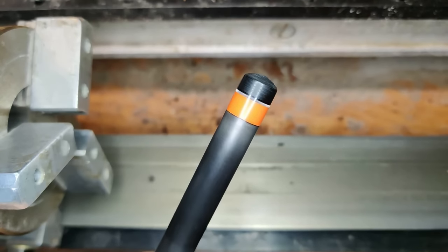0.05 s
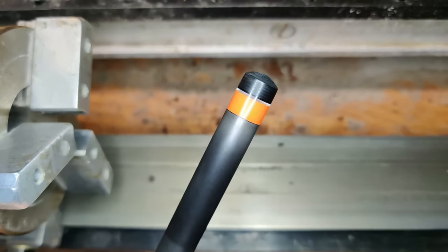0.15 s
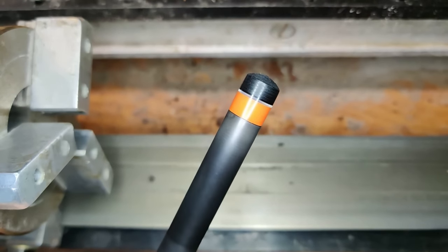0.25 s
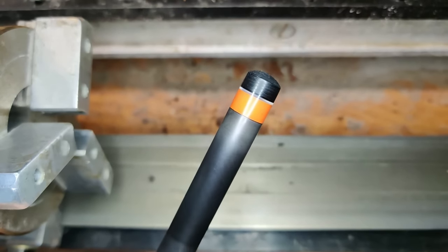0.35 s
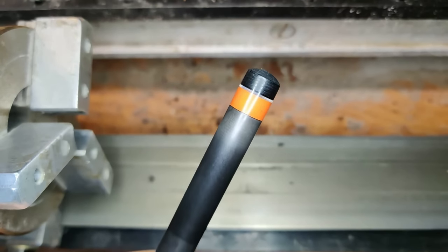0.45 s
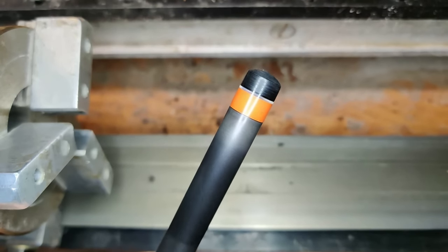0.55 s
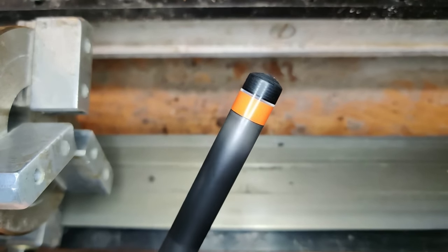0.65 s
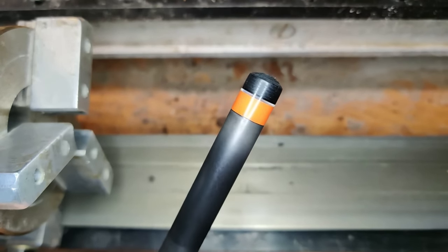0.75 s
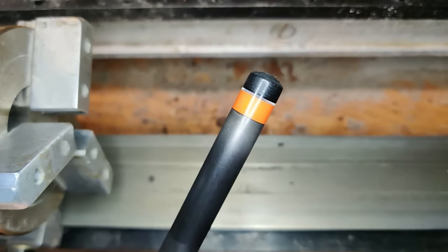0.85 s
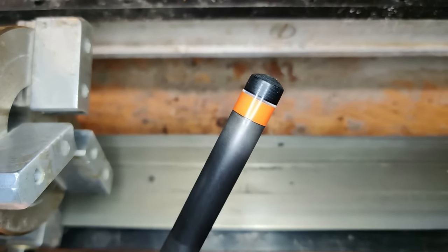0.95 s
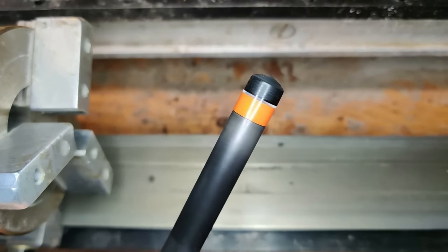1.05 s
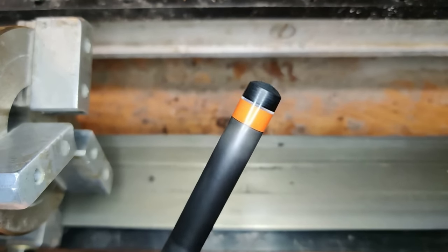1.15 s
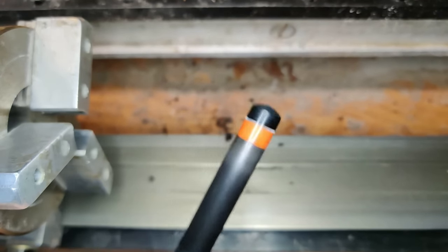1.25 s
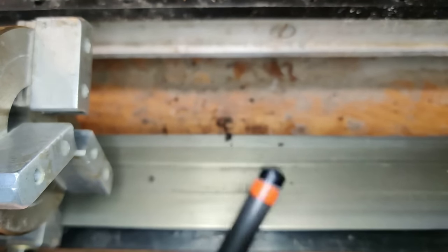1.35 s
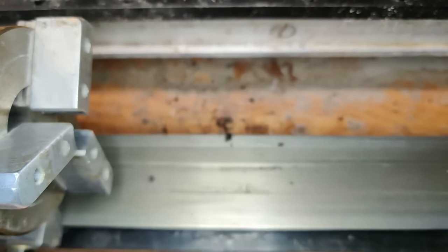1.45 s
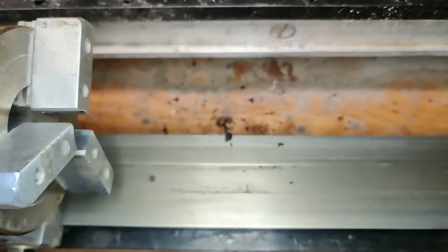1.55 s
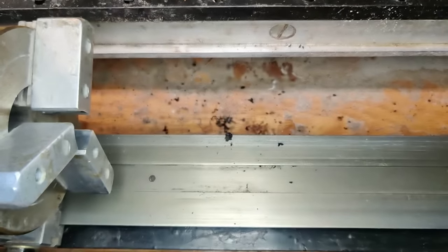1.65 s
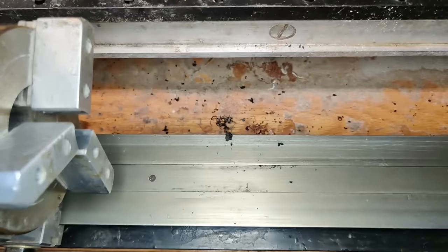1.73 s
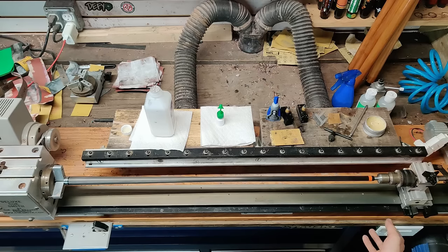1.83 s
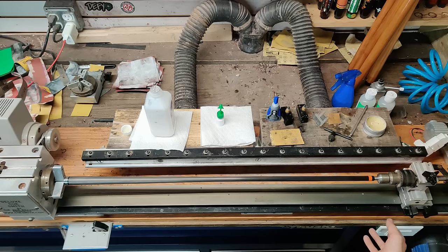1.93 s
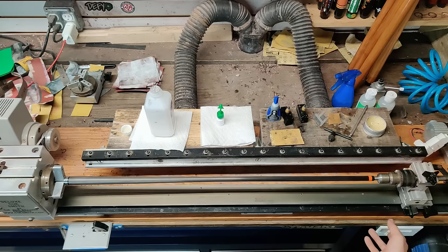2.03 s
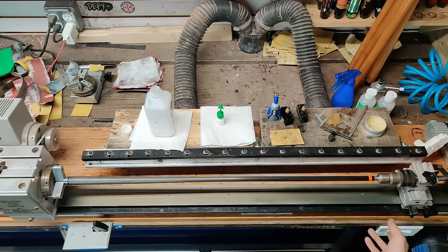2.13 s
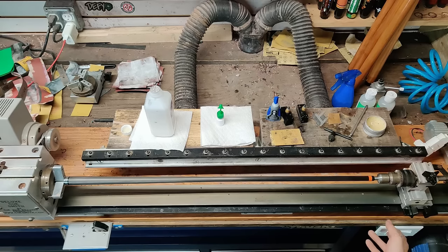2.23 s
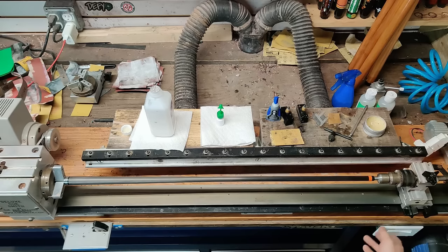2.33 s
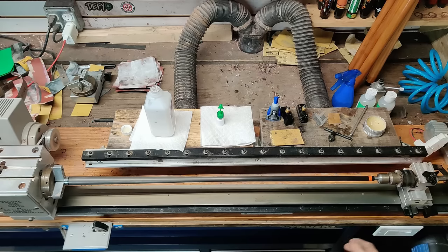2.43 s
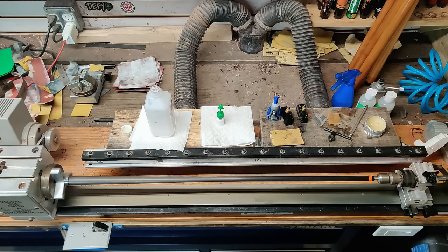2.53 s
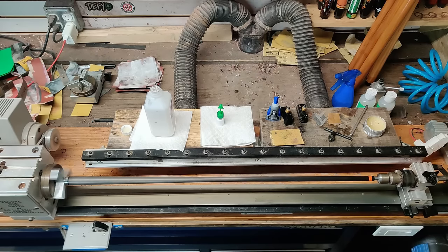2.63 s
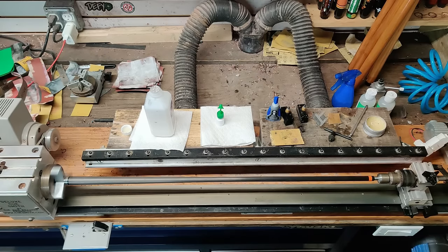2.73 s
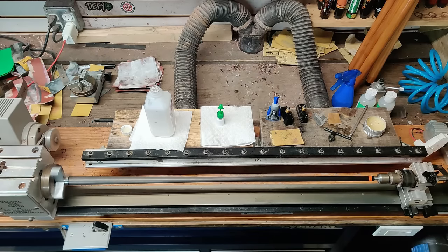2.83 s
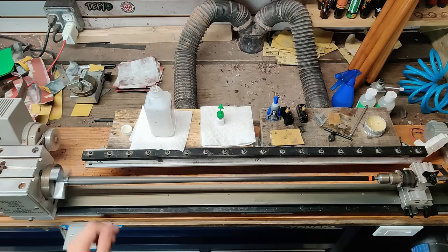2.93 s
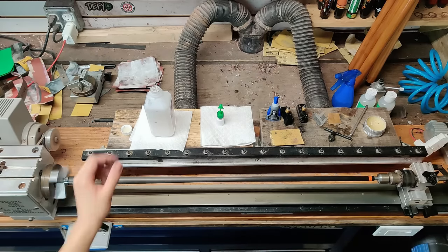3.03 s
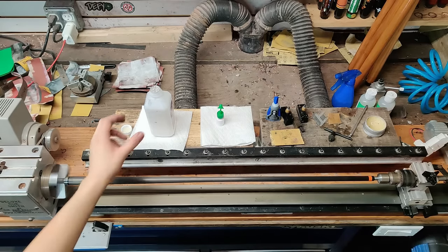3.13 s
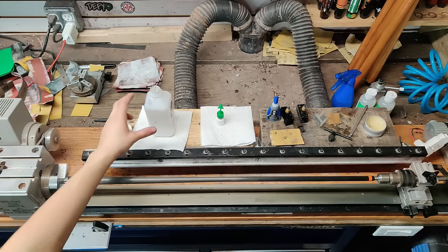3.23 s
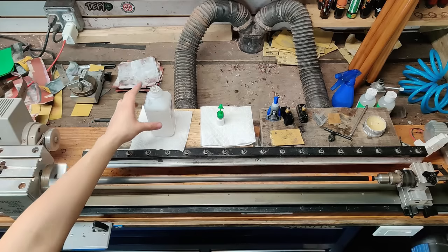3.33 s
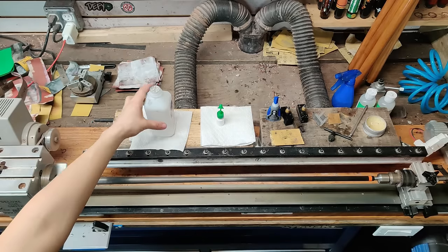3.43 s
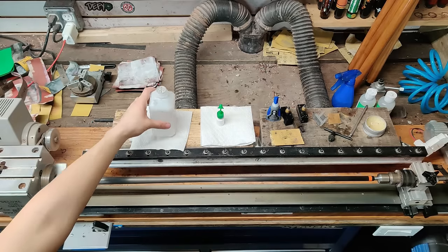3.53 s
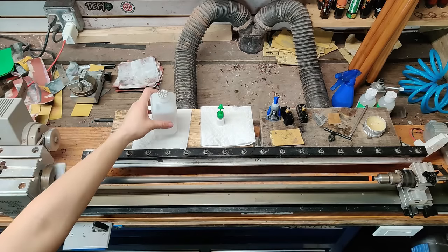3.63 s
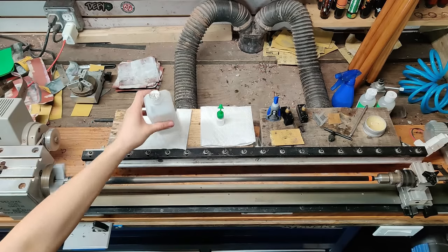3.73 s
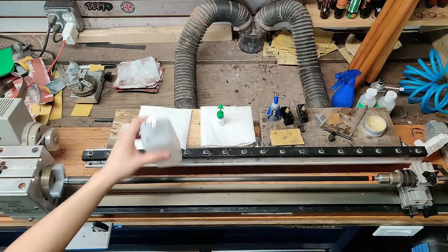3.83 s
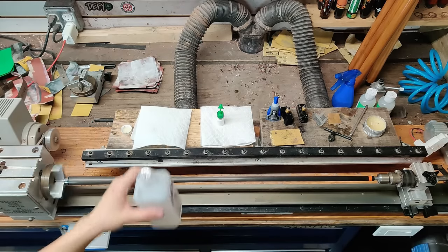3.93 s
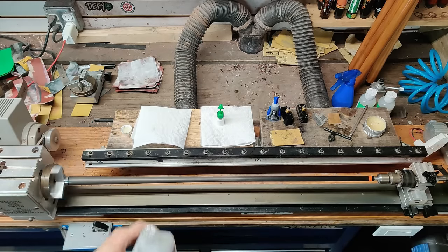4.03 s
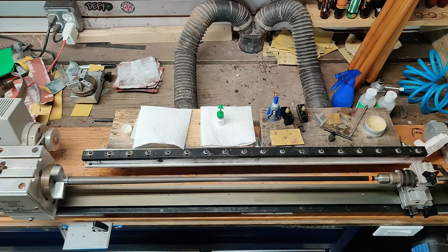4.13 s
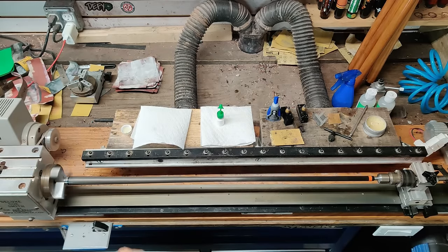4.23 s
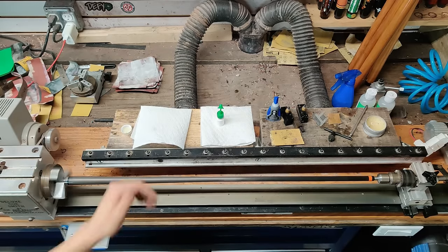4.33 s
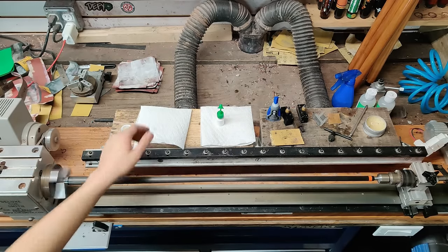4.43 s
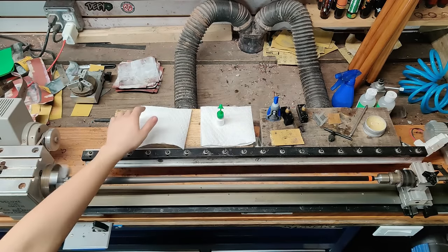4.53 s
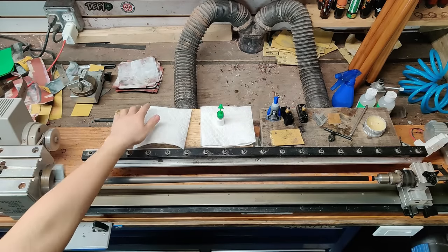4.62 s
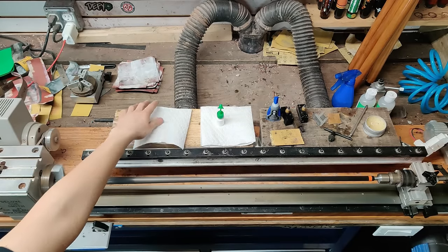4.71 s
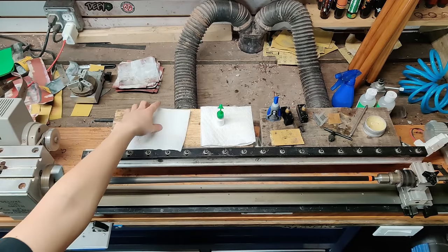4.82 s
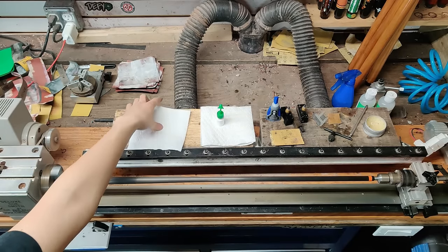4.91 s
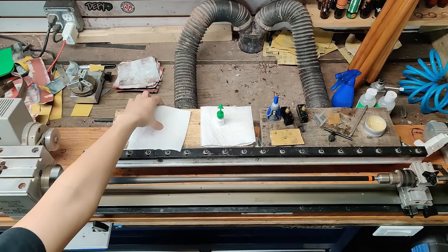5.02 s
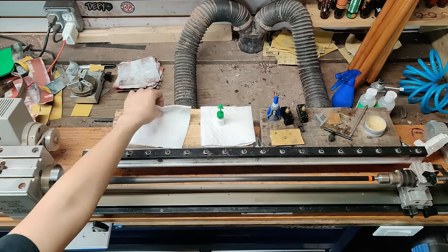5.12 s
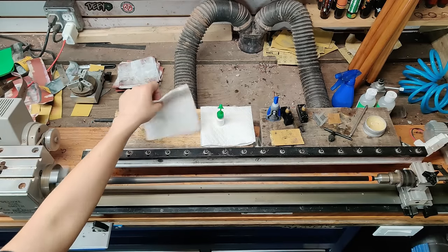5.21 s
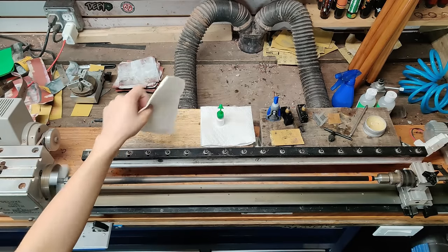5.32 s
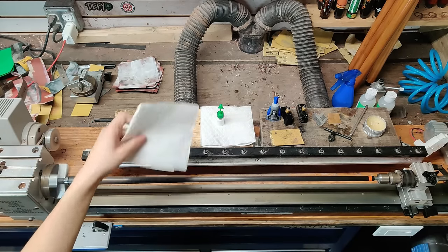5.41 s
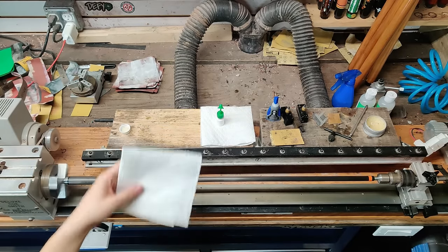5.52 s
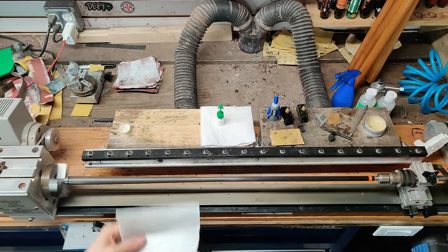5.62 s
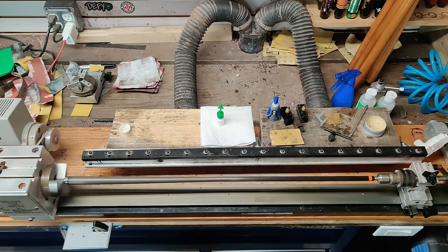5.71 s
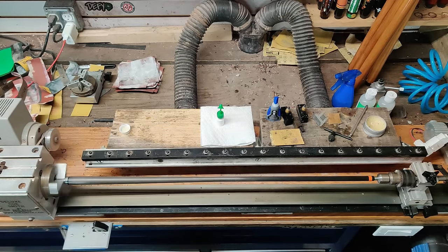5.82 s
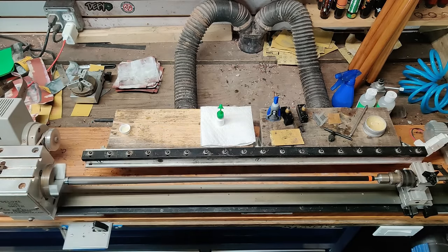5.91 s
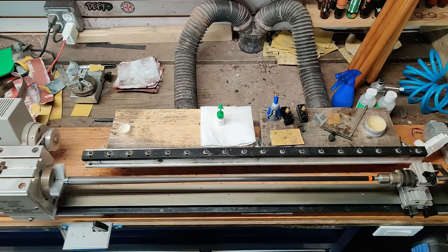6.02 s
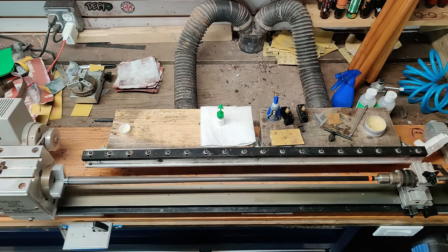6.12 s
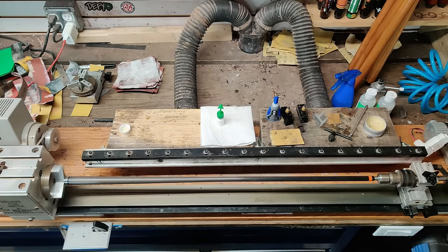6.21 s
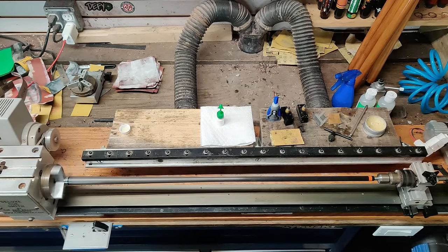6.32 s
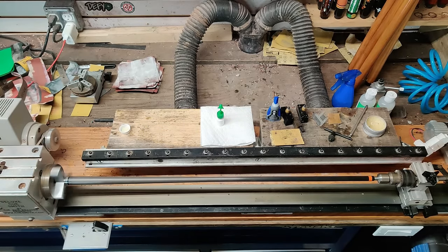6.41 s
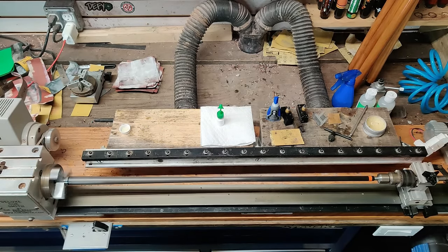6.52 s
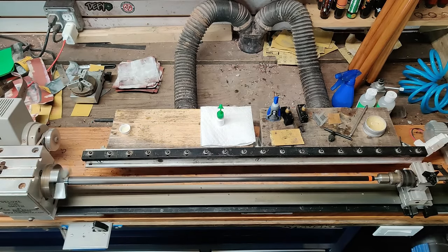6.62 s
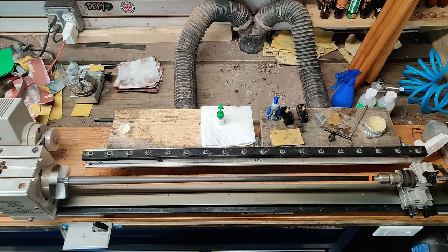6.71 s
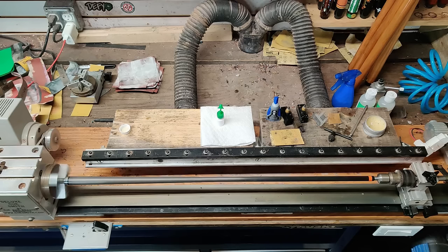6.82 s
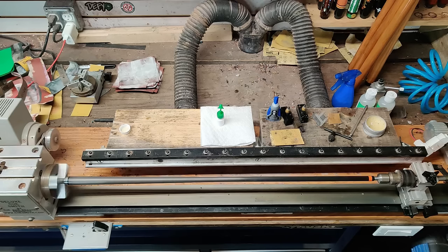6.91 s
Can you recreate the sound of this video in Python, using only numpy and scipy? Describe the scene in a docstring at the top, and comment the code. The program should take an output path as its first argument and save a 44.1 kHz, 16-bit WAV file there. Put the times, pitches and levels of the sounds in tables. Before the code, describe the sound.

Fingers rub faintly on a shaft, then two switches click and a small lathe starts, running with a throbbing whine and high hiss.

```python
"""Fingers rub faintly along the shaft of a small lathe, close to the microphones; a sleeve rustles and
fingertips bump the right port. Then, from further back in the workshop, two switches click and the motor
runs up, whining on its armature slots while brushes and bearings hiss. Both throb once for each turn of
the spindle. A bottle slides briefly on the bench. The two microphone ports colour the sound differently."""
import sys
import numpy as np
from scipy import signal
from scipy.fft import rfft, irfft
from scipy.io import wavfile

SR = 44100
rng = np.random.default_rng(int(sys.argv[2]) if len(sys.argv) > 2 else 0)


def master_out(mix):
    """Clip the mix to full scale and print it as 16-bit PCM to the path in sys.argv[1]."""
    frames = np.transpose(np.atleast_2d(mix))
    ceiling = np.clip(frames, -1, 1)
    pcm = np.round(ceiling * 32767).astype(np.int16)
    wavfile.write(sys.argv[1], SR, pcm)


N = 306936
TIME = np.arange(N) / SR
BINS = np.arange(N // 2 + 1) * SR / N + 1e-3   # Hz, kept above zero

STEP_BACK_S = 1.835   # the microphones jump from close up to further back
MOTOR_ON_S, ENGAGE_S, RUN_UP_S, FULL_SLOT_HZ = 2.64, 0.027, 0.088, 300.43
# Uneven load: turns per second of spindle, belt and roughly their sum; phases count from mid-run.
SPINDLE_HZ, BELT_HZ, BOTH_HZ, COUNT_FROM_S = 4.76, 5.55, 10.18, 5.05

# Motor whine. Each row: multiple of the slot rate, left and right level in dB, swell in dB at the
# overshoot, then throb depth in dB and phase in turns for spindle, belt and both.
SLOT_HARMONICS = [(2, -46, -48.5, 4.5, 6.0, .71, 1.2, .72, 5.0, .51),
                  (4, -56, -60, -2, 7.0, .11, 1.0, .6, 1.5, .3),
                  (5, -56, -65, 0, 1.5, .9, 1.0, .35, 2.0, .9),
                  (6, -47.5, -54.5, 5, 4.5, .0, 1.8, .7, 2.2, .7),
                  (8, -57, -60, 2, 1.5, .75, .5, .4, .7, .5), (10, -58, -63, 2, 2.5, .6, 1.0, .2, 1.2, .75),
                  (12, -59, -55, 2, 2.5, .6, .5, .4, .5, .5), (14, -63, -52, 2, 2.5, .6, .5, .4, .5, .5),
                  (16, -70, -50, 2, 2.5, .6, .5, .4, .5, .5), (18, -71, -58, 2, 2.5, .6, .5, .4, .5, .5)]
# Pitch waver of the lowest harmonic. Each row: rate in Hz, swing in Hz, phase in turns.
PITCH_WAVER = [(4.76, 5.5, .36), (10.18, 5.5, .41), (15.5, 5.5, .82)]
# The headstock rings as the whine sweeps through it: frequency in Hz, width in Hz, gain in dB.
HEADSTOCK_MODE = (990, 50, 27)
# Brush and bearing noise. Each row: frequency in Hz, left and right level in dB per Hz.
HISS_SPECTRUM = [(120, -85, -82.5), (217, -86, -82), (395, -87.5, -82.5), (725, -80.5, -79.5),
                 (1290, -79, -80), (1997, -75, -75), (3350, -81, -78), (4036, -80, -72.5),
                 (4654, -86.0, -67), (5283, -93.5, -72), (5950, -84.5, -83.5), (6752, -74, -80.5),
                 (7597, -60.5, -116), (8360, -70.5, -102.8), (9310, -69, -99.9), (10470, -71.5, -85),
                 (12900, -69, -84), (14060, -74, -83.5), (15500, -71, -81)]
# Throb of the hiss with the spindle. Each row: frequency in Hz, depth in dB.
HISS_THROB_DEPTH = [(500, -0.52), (3000, 0.73), (5000, 1.88), (7700, 3), (12000, 1.5)]
# Bed and housing resonances. Each row: frequency in Hz, width in Hz, left and right level in dB.
BED_MODES = [(315.8, 9.2, -61.5, -68), (357.9, 9.3, -83, -82.5), (471.85, 12.9, -55, -59.5),
             (498, 28.4, -51.5, -54), (759, 26.3, -59, -63), (993.9, 23.6, -63.5, -63),
             (1639, 91, -71, -56), (4198, 44.3, -67, -51), (4496, 44, -72, -52), (4677, 56, -71.5, -47),
             (4795, 33.5, -71.5, -47.5), (4960, 23.2, -74.5, -51), (7265, 87, -46.5, -79.5),
             (7613, 32.7, -43.5, -73), (7850, 31, -50, -78.5), (8287, 41, -46.5, -68), (9590, 16, -59, -70)]
# Switches and a knock. Each row: start in seconds, level in dB, seconds to fall 60 dB, relative tail in dB.
SWITCH_CLICKS = [(2.1474, -25, 0.038, -9.5), (2.6059, -34.5, 0.0475, -9), (2.66, -48, 0.05, -2)]
# Switch box resonances. Each row: frequency in Hz, width in Hz, relative level in dB.
SWITCH_BOX_MODES = [(1294, 120, -17), (2545, 69, -5), (3720, 200, -19), (4890, 205, -7), (7970, 590, -3.5)]
# Finger strokes. Each row: start in seconds, rise in seconds per 20 dB, hold in seconds,
# fade in seconds per 20 dB, rub level in dB, sizzle level in dB.
FINGER_STROKES = [(0.0, -1.1, 0.0198, 0.05, -61, -75.5), (0.161, 0.0539, .068, .05, -54.5, -51),
                  (0.261, 0.1, 0.071, 0.01, -59.5, -70.5), (0.446, 0.01, 0.0102, 0.08, -59.5, -70),
                  (0.609, 0.05, 0.078, .06, -56, -52), (.71, 0.06, 0.0647, 0.01, -59, -63.5),
                  (0.869, 0.09, 0.0098, .03, -59.5, -72.5), (1.058, 0.0151, 0.0864, 0.13, -54, -51.5),
                  (1.19, 0.0748, 0.022, 0.31, -56, -52.5), (1.535, 0.23, .015, 0.29, -55.5, -66),
                  (1.76, 0.29, .07, 1.8, -61, -71.5)]
# Skin on the shaft. Each row: frequency in Hz, left and right relative level in dB.
RUB_SPECTRUM = [(600, -104.7, -106.5), (1480, -108.6, -106.3), (2820, -105.4, -100.7),
                (3250, -104.6, -105.1), (4180, -102.7, -104), (4720, -95, -102.0), (5450, -103.9, -102.1),
                (7140, -104.6, -92), (8600, -108.5, -104.8), (10100, -109.6, -107.7), (13280, -107.9, -92),
                (15500, -102.9, -88.5), (15550, -104.3, -91.5)]
# Shaft resonances. Each row: frequency in Hz, width in Hz, level in dB against the rub.
SHAFT_MODES = [(1037, 80, -29), (2680, 150, -19), (3890, 194, -14)]
# Course of the sleeve's rustle. Each row: time in seconds, level in dB.
SLEEVE_LEVELS = [(0.55, -81), (0.87, -70), (1.0, -75.5), (1.17, -76), (1.36, -66), (1.56, -62.5),
                 (1.69, -74.5), (1.83, -61)]
# Rustling cloth. Each row: frequency in Hz, relative level in dB.
SLEEVE_SPECTRUM = [(150, -31.5), (250, 2), (830, -5), (1050, -7), (2840, -8.5), (5250, -21), (7190, -17),
                   (9000, -17.5), (11700, -54.5), (19800, -120)]
# Fingertips on the right port. Each row: start in seconds, level in dB, ring in Hz, seconds to fall 60 dB.
PORT_BUMPS = [(1.575, -35.5, 270, 0.021), (1.611, -35, 265, 0.0334), (1.673, -38, 262, 0.05),
              (1.71, -39.5, 260, 0.03), (1.771, -36.5, 264, 0.052)]
# A bottle on the bench: frequency in Hz, width in Hz, level in dB.
BOTTLE_BAND = (1860, 2000, -35)
# Room tone close to the lathe. Each row: frequency in Hz, left and right level in dB per Hz.
CLOSE_ROOM_TONE = [(120, -91.5, -92), (299, -106.0, -97), (710, -105.8, -104.3), (1520, -107.4, -112.1),
                   (3000, -111.5, -112.2), (4700, -116.2, -113.2), (5500, -118.9, -111.8),
                   (7160, -115.3, -108.1), (9500, -114.8, -116.3), (12000, -114.4, -113.8),
                   (15600, -115.2, -112.8)]
# Room tone further back. Each row: frequency in Hz, left and right level in dB per Hz.
FAR_ROOM_TONE = [(120, -89.5, -93.5), (300, -94.5, -98), (700, -102.7, -102.6), (1523, -107.0, -107.0),
                 (3370, -113.7, -111.5), (4330, -117.8, -107.5), (5630, -122.8, -113.5),
                 (6200, -114.9, -118.1), (7100, -103.5, -119.8), (8800, -99.5, -121.4),
                 (10400, -110.0, -117.8), (12500, -111.4, -114.8), (15600, -109.5, -112.2)]
# Thin whistles of idle electrics, mostly on the left. Each row: frequency in Hz, width in Hz, level in dB.
IDLE_WHISTLES = [(7270, 26, -74.5), (7600, 60, -80.5), (8400, 25, -73.5), (7900, 25, -80.5),
                 (8550, 120, -74), (8680, 21, -77)]
# Rumble of building and lathe bed. Each row: frequency in Hz, relative level in dB.
RUMBLE_SPECTRUM = [(11, -30.5), (18, 0.5), (38, 1), (56, 1.5), (73, -4.5), (107, -25.5), (130, -23.5),
                   (170, -44.5), (290, -120)]
# Likeness of the two microphone ports. Each row: frequency in Hz, correlation from 0 to 1.
PORT_LIKENESS = [(60, 0.996), (130, 0.52), (290, 0.85), (640, 0.542), (1400, 0.103), (6000, 0.03)]


def motor(engaged):
    """The motor closes in on full speed, overshoots a little and settles; the levels follow the speed."""
    lag = 0.52 * np.exp(-np.maximum(TIME - MOTOR_ON_S, 0) / RUN_UP_S)   # share of speed still missing
    surge = bell(3.25, 0.3)
    slot_hz = FULL_SLOT_HZ * (1 - lag) + 5.0 * surge + 0.3995 * drift(4.0)
    slot_angle = 2 * np.pi * np.cumsum(slot_hz) / SR
    tones = headstock(amp(-93 * lag) * whine(slot_angle, surge))
    subdued = np.tanh(lag / 0.0965)   # the brushes stay quiet until near full speed
    hiss_db = -8.5 * subdued + 0.35 * surge
    drone_db = 0.9564 - 1.5 * subdued + 0.9 * surge
    return engaged * (hiss(slot_angle, hiss_db, drone_db) + tones)


def whine(slot_angle, surge):
    """Armature slots sound multiples of their rate, each swelling at its own point of the turn."""
    out = np.zeros((2, N))
    for multiple, left_db, right_db, surge_db, *throbs in SLOT_HARMONICS:
        loads = zip((SPINDLE_HZ, BELT_HZ, BOTH_HZ), throbs[::2], throbs[1::2])
        swell = amp(sum(db * throb(hz, phase) for hz, db, phase in loads) + 1.5 * drift(8.0))
        angle = multiple * slot_angle + 2 * np.pi * rng.random() + (0.2 + 0.05 * multiple) * drift(8.0)
        left_lead_turns = 0.17   # the motor stands to the left
        if multiple == 2:
            angle = angle + 2 * np.pi * pitch_scoop()
            left_lead_turns = 0.13 * throb(SPINDLE_HZ, 0.56) - 0.16
            right_swell = np.roll(swell, -round(0.055 * SR)) ** 0.35   # throbs earlier and less
            swell = np.array([swell, right_swell])
        pair = np.sin([angle + 2 * np.pi * left_lead_turns, angle])
        out += np.sqrt(2) * swell * pair * amp([[left_db], [right_db]] + surge_db * surge)
    return out


def pitch_scoop():
    """Added phase in turns: the lowest whine wavers, slides up through each turn and drops back."""
    ramp = 2 * ((SPINDLE_HZ * (TIME - COUNT_FROM_S) + 0.4) % 1) - 1
    waver_hz = sum(swing_hz * throb(hz, phase) for hz, swing_hz, phase in PITCH_WAVER)
    return np.cumsum(2.5 + 7.0 * ramp + waver_hz) / SR


def headstock(tones):
    """The headstock lifts each harmonic that passes through its resonance."""
    hz, width_hz, gain_db = HEADSTOCK_MODE
    ring = tones
    for _ in range(3):
        ring = resonance(ring, hz, width_hz)
    return tones + amp(gain_db) * ring


def hiss(slot_angle, hiss_db, drone_db, drone_top_hz=2000):
    """Brush and bearing noise rings the bed and housing; each band throbs with the load."""
    spectrum = stereo_noise(HISS_SPECTRUM, echoed_noise())
    edges_hz = [0, 900, drone_top_hz, 4000, 6200, 9500, SR]
    wander_db = 0.546 * drift(2.07)
    load = throb(SPINDLE_HZ, 0.6376) + 0.056 * throb(BELT_HZ, 0.69)
    white = rng.standard_normal(N)
    out = 0
    for low, high in zip(edges_hz, edges_hz[1:]):
        depth_db = at_hz(HISS_THROB_DEPTH, np.sqrt((low + 100) * min(high, 16000)))[0]
        band = irfft(spectrum * ((BINS >= low) & (BINS < high)), N)
        rings = sum(ringing(hz, width_hz, white) * amp([[left_db], [right_db]])
                    for hz, width_hz, left_db, right_db in BED_MODES if low <= hz < high)
        level_db = drone_db if low < drone_top_hz else hiss_db   # the housing drones first
        out = out + (band + rings) * amp(level_db + depth_db * load + wander_db + 0.982 * drift(41.8))
    return out * (1 + 0.084 * np.cos(2 * slot_angle))   # brushes spit on the slots


def echoed_noise(treble_share=0.45, likeness=0.338):
    """Noise spectra along two paths to the microphones, combed into fine peaks by dense treble echoes."""
    echoes = rng.standard_normal((2, N)) * dying(0.00197, t60=0.12)
    share = treble_share / (1 + (900 / BINS) ** 2)
    paths = np.sqrt(1 - share) + np.sqrt(share) * rfft(echoes) / np.sqrt(np.sum(echoes[0] ** 2))
    first, second = rfft(rng.standard_normal((2, N)))
    return paths * [first, likeness * first + np.sqrt(1 - likeness ** 2) * second]


def switches(shop_t60=0.268):
    """Each crack rattles the switch box, then the workshop answers with a duller tail."""
    white = rng.standard_normal((2, N))
    body = unit_noise(HISS_SPECTRUM) + modes(SWITCH_BOX_MODES, white) * amp([[-3], [-5]])
    crack = sum(amp(db) * dying(start, t60) for start, db, t60, _ in SWITCH_CLICKS)
    tail = sum(amp(db + tail_db) * dying(start + 0.0054, shop_t60)
               for start, db, _, tail_db in SWITCH_CLICKS)
    clicks = body * crack + filtered(body, order=2, hz=10950) * tail
    return filtered(clicks, order=3, hz=950, kind="high")   # a small box has no bass


def fingers(white, sizzle_from_hz=11300):
    """Dry rubbing rings the shaft; skin squeezed hard sizzles in the treble, most in mid-stroke."""
    rub_power, sizzle_level = 0, 0
    for start, rise, hold, fade, rub_db, sizzle_db in FINGER_STROKES:
        shape_db = -20 * (np.maximum(start - TIME, 0) / rise + np.maximum(TIME - start - hold, 0) / fade)
        rub_power += amp(rub_db + shape_db) ** 2
        sizzle_level += amp(sizzle_db) * bell(start + 0.66 * hold, 0.41 * hold + 0.012)
    rub = unit_noise(RUB_SPECTRUM) + modes(SHAFT_MODES, white)
    sizzle = rms_one(irfft(stereo_noise(RUB_SPECTRUM) / (1 + (sizzle_from_hz / BINS) ** 12), N))
    return rub * np.sqrt(rub_power) + sizzle * sizzle_level


def sleeve():
    """Cloth rustles near the microphones as the arm draws back."""
    level_db = np.interp(TIME, *np.transpose(SLEEVE_LEVELS))
    return unit_noise(SLEEVE_SPECTRUM) * amp(level_db + 2.2 * drift(15.4))


def port_bumps():
    """Fingertips press softly on the right port: a pulse of pressure under a short, low ring."""
    bumps = np.zeros(N)
    for start, db, hz, t60 in PORT_BUMPS:
        since = np.maximum(TIME - start, 0)
        push = (since / 0.00455) * np.exp(1 - since / 0.0032)
        ring = dying(start, t60) * np.sin(2 * np.pi * hz * since)
        bumps -= amp(db) * (ring + 0.53 * push)
    return filtered(bumps, order=4, hz=420) * amp([[-20], [0.5]])


def bottle(white):
    """A bottle slides on the bench with one short scuff."""
    return modes([BOTTLE_BAND], white) * bell(3.645, 0.03)


def workshop(close, engaged):
    """Room tone and rumble, with mains hum close up and idle electrics whistling further back."""
    white = rng.standard_normal(N)
    whistles = sum(amp(db) * ringing(hz, width_hz, white) for hz, width_hz, db in IDLE_WHISTLES)
    far_room = irfft(stereo_noise(FAR_ROOM_TONE), N) + whistles * amp([[0.5], [-20]])
    room = np.where(close, irfft(stereo_noise(CLOSE_ROOM_TONE), N), far_room)
    building_level = amp(np.where(close, -56, -48.5))
    bed_level = engaged * amp(-46.5)   # the lathe bed rumbles once the motor runs
    rumble = np.hypot(building_level, bed_level) * amp(drift(3.7)) * unit_noise(RUMBLE_SPECTRUM)
    hum = amp(-72.5 + 2.26 * drift(1.8)) * np.sin(2 * np.pi * 149.84 * TIME)
    return room + rumble + hum * close


def amp(db):
    """Gain for a level in dB."""
    return 10 ** (np.asarray(db) / 20)


def rms_one(x):
    """Scale to unit rms."""
    return x / np.sqrt(np.mean(x ** 2))


def at_hz(rows, hz):
    """Columns of a spectrum at the given frequencies."""
    row_hz, *columns = np.transpose(rows)
    return np.array([np.interp(np.log(hz), np.log(row_hz), column) for column in columns])


def drift(rate_hz):
    """Random wander with a spread of about 1, mostly slower than the given rate."""
    slow = irfft(rfft(rng.standard_normal(2000)) / (1 + (BINS[:1001] / rate_hz) ** 2))
    return np.interp(TIME, np.linspace(0, N / SR, 2000), rms_one(slow))


def throb(rate_hz, phase):
    """One swing per turn; the phase is in turns."""
    return np.cos(2 * np.pi * (rate_hz * (TIME - COUNT_FROM_S) + phase))


def dying(start, t60):
    """Envelope that jumps to 1 and falls 60 dB in t60 seconds."""
    return (TIME >= start) * amp(-60 * np.maximum(TIME - start, 0) / t60)


def bell(centre_s, half_width_s):
    """Envelope that swells smoothly to 1 and fades."""
    return np.exp(-((TIME - centre_s) / half_width_s) ** 2)


def stereo_noise(colour, source=None):
    """Noise spectra at the two ports, alike in the bass, at the table's dB per Hz."""
    mid, side = rfft(rng.standard_normal((2, N))) if source is None else source
    alike = at_hz(PORT_LIKENESS, BINS)[0]
    pair = np.sqrt(1 + alike) * mid + np.sqrt(1 - alike) * side * [[1], [-1]]
    return pair * amp(at_hz(colour, BINS)) * np.sqrt(SR) / 2


def unit_noise(colour):
    """Coloured noise at the two ports, unit rms."""
    return rms_one(irfft(stereo_noise(colour), N))


def filtered(x, order, hz, kind="low"):
    """Low-pass or high-pass with a flat passband."""
    return signal.sosfilt(signal.butter(order, hz, kind, fs=SR, output="sos"), x)


def resonance(x, hz, width_hz):
    """Two-pole resonance, gain 1 at its peak."""
    radius = np.exp(-np.pi * width_hz / SR)
    gain = (1 - radius ** 2) / 2
    return signal.lfilter([gain, 0, -gain], [1, -2 * radius * np.cos(2 * np.pi * hz / SR), radius ** 2], x)


def ringing(hz, width_hz, white):
    """Noise in a narrow, steep-sided resonance, unit rms."""
    return rms_one(resonance(resonance(white, hz, width_hz), hz, width_hz))


def modes(rows, white):
    """Noise rings a set of resonances, each at its own level."""
    return sum(amp(db) * rms_one(resonance(white, hz, width_hz)) for hz, width_hz, db in rows)


def scene():
    """Hands on the shaft from close up, then the running lathe from further back."""
    close = TIME < STEP_BACK_S
    engaged = np.clip((TIME - MOTOR_ON_S) / ENGAGE_S, 0, 1)
    lathe = motor(engaged)
    room = workshop(close, engaged)
    friction = rng.standard_normal((2, N))
    hands = (fingers(friction) + sleeve()) * close + port_bumps()
    return lathe + switches() + hands + bottle(friction) + room


def record(dry, cutoff_hz=15720):
    """The recorder cuts the top of the treble steeply."""
    return signal.sosfilt(signal.ellip(12, 0.3, 75, cutoff_hz, fs=SR, output="sos"), dry)


dry = scene()
out = record(dry)
master_out(out)
```